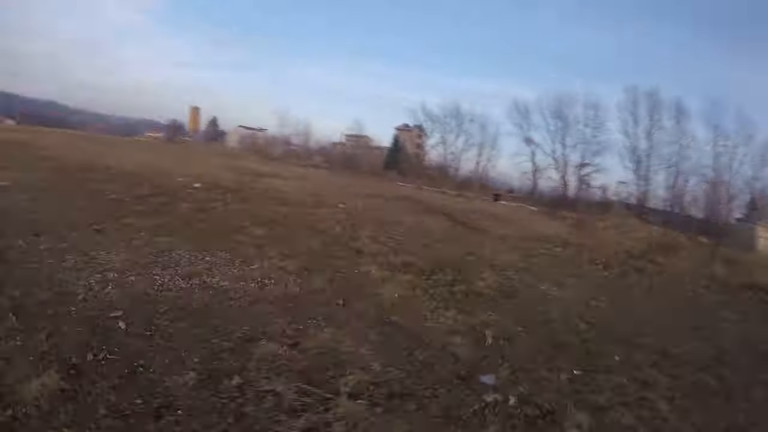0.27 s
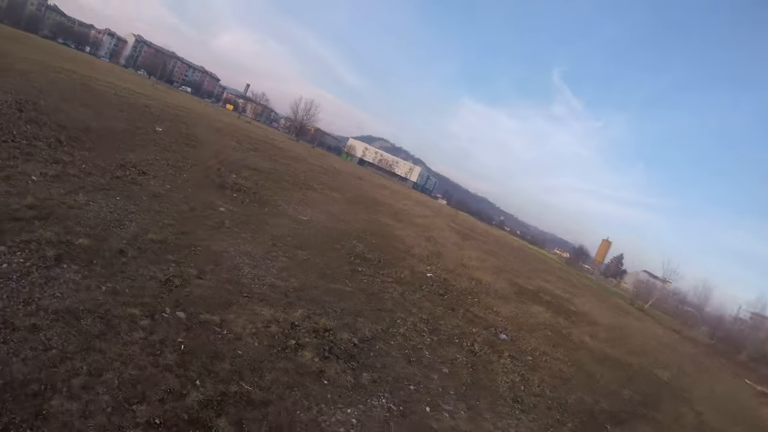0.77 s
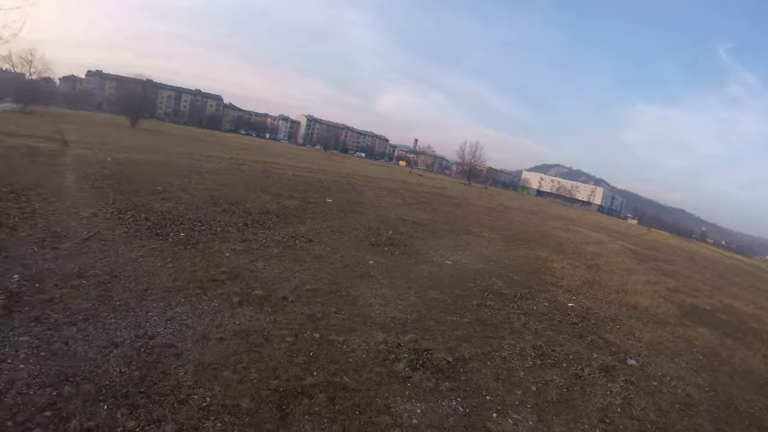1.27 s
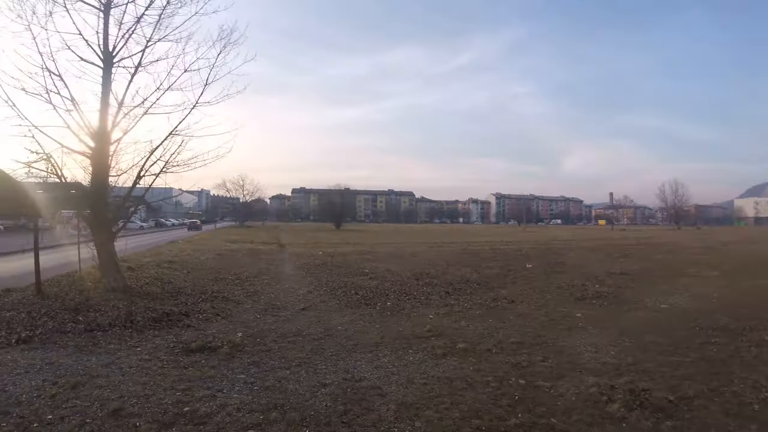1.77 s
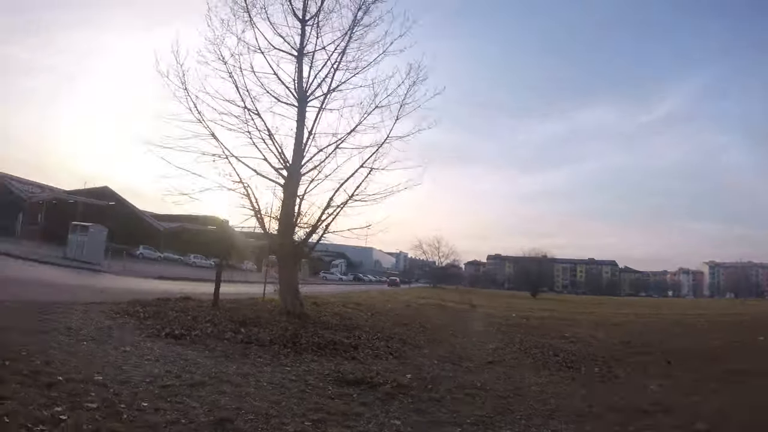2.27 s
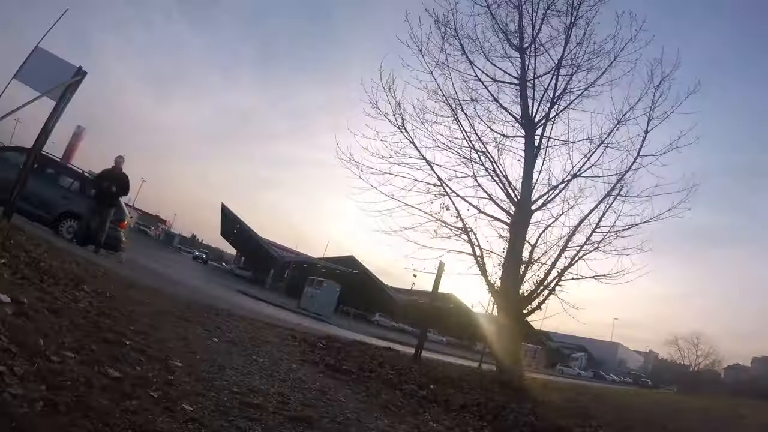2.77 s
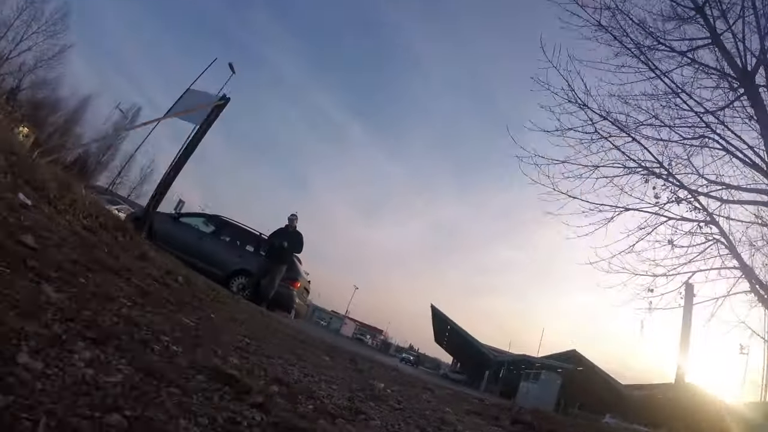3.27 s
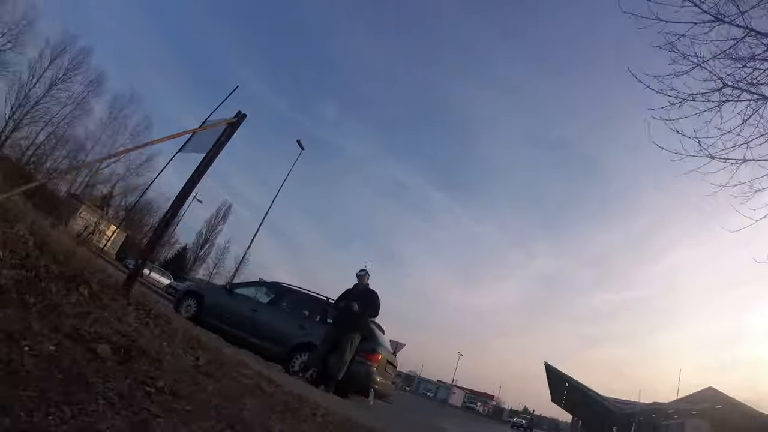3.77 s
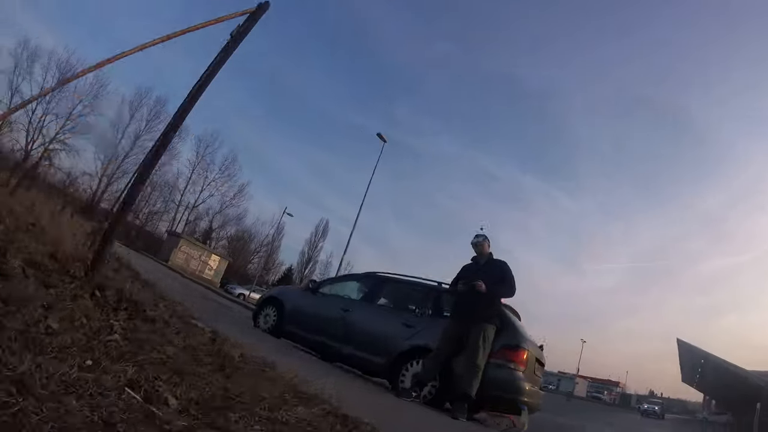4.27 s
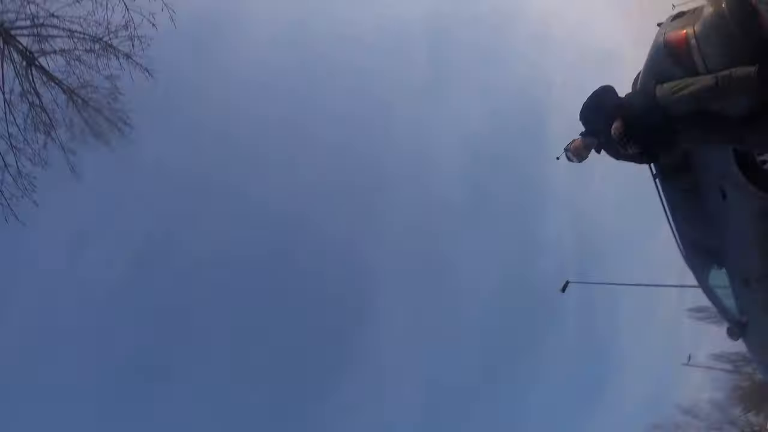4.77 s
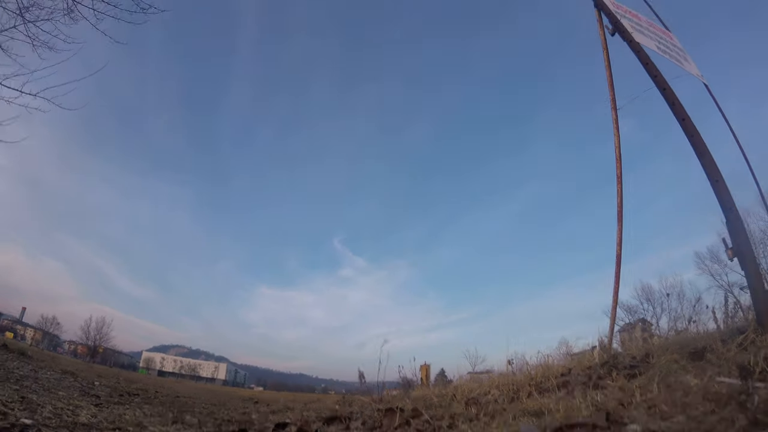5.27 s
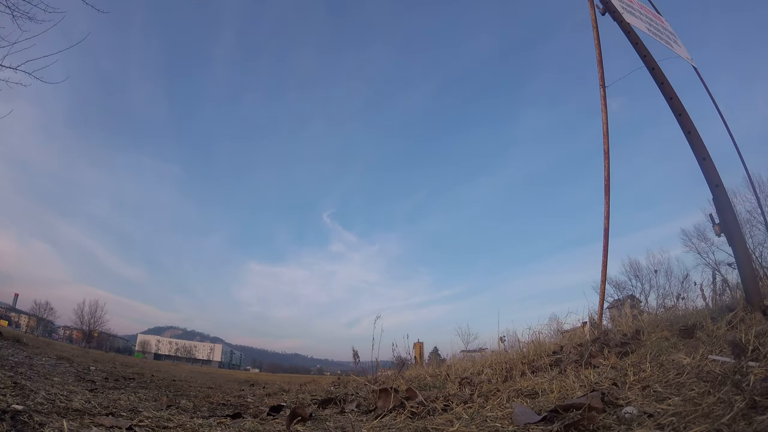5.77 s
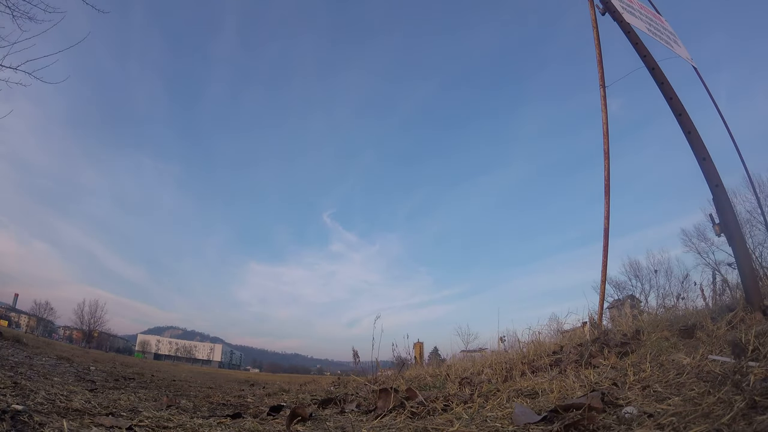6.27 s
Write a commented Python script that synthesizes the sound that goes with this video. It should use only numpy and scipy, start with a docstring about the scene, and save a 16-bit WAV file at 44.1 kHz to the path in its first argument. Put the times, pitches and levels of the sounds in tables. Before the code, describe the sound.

Small propellers buzz and hiss very close to the microphone, pitch leaping up and falling twice before a slack lull, then a steadier wavering drone that swells again. It stops abruptly; dull thumps, brittle stalk cracks and a short scrape follow, then a second bounce and crunch, and quiet open air with one tiny late crackle.

```python
"""Small drone cuts out and drops into the grass

Four motors whine as their three-blade propellers change speed, heard by a microphone on the craft: sines on
the orders of each shaft. Filtered noise makes the wash, blade-tip hiss and buffeting. The power is cut just
above the grass; the frame thuds, bounces and rings (decaying sines), stalks crack and drag (noise bursts and
a noise bed), and it comes to rest in a faint outdoor background, noise whose level falls and rises again."""
import sys
import numpy as np
from scipy.fft import rfft, irfft, next_fast_len
from scipy.io import wavfile
from scipy.ndimage import uniform_filter1d, map_coordinates

SR = 44100
rng = np.random.default_rng(int(sys.argv[2]) if len(sys.argv) > 2 else 0)


def generate_wav(signal):
    """Clip the signal to [-1, 1] and save it as 16-bit WAV at the path in sys.argv[1]."""
    frames = np.transpose(np.atleast_2d(signal))
    scaled = np.clip(frames, -1, 1) * 32767
    pcm = np.round(scaled).astype(np.int16)
    wavfile.write(sys.argv[1], SR, pcm)


N = 288408
CUT_S = 4.335  # the motors have lost all power by now


def amp(db):
    """Decibels to a linear gain."""
    return 10 ** (np.asarray(db) / 20)


def curves(rows):
    """One value per sample for each column after the time, joined by straight lines."""
    s, *cols = np.transpose(rows)
    return [np.interp(np.arange(N) / SR, s, c) for c in cols]


def wobble(rate):
    """A smooth random curve with rate knots a second."""
    steps = np.arange(0, N + 16, 16)  # computed every 16 samples, then joined
    knots = rng.standard_normal(int(N * rate / SR) + 4)
    return np.interp(np.arange(N), steps, map_coordinates(knots, [steps * rate / SR]))


def noise(spectrum, size=N):
    """Noise of rms 1, shaped by (Hz, relative dB) points joined on a log frequency axis."""
    m = next_fast_len(size + 4096)
    hz, db = np.transpose(spectrum)
    log_hz = np.log(np.fft.rfftfreq(m, 1 / SR) + 1)
    gain = amp(np.interp(log_hz, np.log(hz + 1), db, left=-120, right=-120))
    x = irfft(rfft(rng.standard_normal(m)) * gain, m)[:size]
    return x / np.std(x)


def background():
    """Faint outdoor noise, a low rumble and a broad field sound, heard once the motors are silent."""
    # Background level after the crash, dropping and then rising again.
    # Each row: time in seconds, rumble level in dB, field level in dB.
    background_levels = [(4.5, -29, -52), (5.0, -35, -63.5), (5.45, -46, -65), (5.7, -54.5, -59.5),
                         (6.1, -47, -54.5), (6.54, -41, -51)]
    # Colour of the field. Each row: frequency in Hz, relative level in dB.
    field_spectrum = [(90, -24), (150, -2), (250, -10.5), (700, -17), (1500, -25), (2800, -37), (4600, -51),
                      (7500, -37.5), (10000, -41), (12000, -57), (15000, -58)]
    rumble_db, field_db = curves([(4.4, -93, -92)] + background_levels)
    rumble_spectrum = [(20, -5.5), (45, -3.0), (90, -5.5), (160, -24.5), (250, -38.0)]
    rumble = amp(rumble_db + 2.8 * wobble(8.3)) * noise(rumble_spectrum)
    field = amp(field_db + 0.85 * wobble(9)) * noise(field_spectrum)
    return rumble + field


def stalks_drag():
    """Dry stalks scrape along the frame: unsteady noise that swells and fades with each slide."""
    # Each row: moment of the loudest scrape in seconds, level in dB, fade in dB per second.
    slides = [(4.33, -19.5, 170), (4.68, -42.5, 126), (4.9, -55.5, 48), (5.09, -53.5, 10), (5.231, -31, 88)]
    rise_db_per_s, end_s = 297.5, 5.42
    now = np.arange(N) / SR
    drag_db = np.max([db - np.maximum(fade * (now - s), rise_db_per_s * (s - now))
                      for s, db, fade in slides], axis=0)
    drag_db = drag_db - 150 * np.maximum(now - end_s, 0)  # extra fade after the last slide
    spectrum = [(150, -2.5), (400, 8), (1000, -9.0), (2200, -20.5), (3500, -49), (5500, -28.0), (9000, -53.0)]
    return amp(drag_db + 4.2 * wobble(90)) * noise(spectrum)


def stalks_crack():
    """Blades and stalks crack: each is a dying crunch of bright snap, treble fizz and dull body."""
    # Each row: start in seconds, relative level in dB, body and treble in dB over that level.
    cracks = [(4.526, -58, 14, -20), (4.576, -16, 16.5, -2.5), (4.585, -25.5, 18, -11),
              (4.6002, -21, 0, -5.5), (4.6189, -21.5, 12, -9), (4.6543, -31, 14, -11),
              (4.693, -33.5, 10, -11), (4.715, -46, 11, -22), (4.761, -56, 17, -28),
              (4.8419, -31.5, 20.5, -14), (4.9138, -50, 19.5, -17), (5.001, -54, 15, -1),
              (5.0837, -45, 11, -11), (5.178, -31, 4, -7.5), (5.1901, -17, 9.5, -17),
              (5.206, -28.5, 11, -19), (5.2188, -23, -5, -20.5), (5.2446, -33, 17, -24),
              (5.27, -44, 14, -12), (5.2968, -42, 18, -10), (5.312, -34.5, 17.5, -13),
              (5.3297, -37, 18.5, -13), (5.368, -44.5, 23, -14), (5.44, -52, 16, -22),
              (6.4417, -44, -6, -4)]
    # Colours of the snap, treble and body. Each row: frequency in Hz, relative level in dB.
    snap_spectrum = [(600, -12), (900, -3.5), (2000, -5), (2600, -16.5), (4000, -26.5)]
    fizz_spectrum = [(3500, -24.5), (5000, -11.5), (5500, -4), (6100, -9), (9500, -12), (11400, -30),
                     (15000, -45.5)]
    body_spectrum = [(150, -17), (250, -5), (500, -12.5), (1000, -23.5), (1500, -57.5)]
    x, t = np.zeros(N + SR), np.arange(SR // 5 * 2) / SR
    grit = np.pad(amp(3 * wobble(450)), (0, SR))  # each crunch is many small breaks
    for s, db, body_db, fizz_db in cracks:
        start = round(s * SR)
        length = amp(0.2 * (db + 24))  # faint cracks die sooner
        fizz = amp(fizz_db - 60 * t / 0.23) * noise(fizz_spectrum, size=len(t))
        bright = noise(snap_spectrum, size=len(t)) + fizz
        snap = amp(-60 * t / (0.083 * length)) * bright * (1 - np.exp(-t / 0.0013))
        snap = snap * grit[start:][:len(t)]
        body = amp(body_db - 60 * t / (0.12 * length)) * noise(body_spectrum, size=len(t))
        body = body * (1 - np.exp(-t / 0.0015))
        x[start:][:len(t)] += amp(db - 6.5) * (snap + body)
    return x[:N]


def thuds():
    """The frame meets the ground: each impact is one slow push and a ring of the frame's modes."""
    # Each row: start in seconds, relative push level in dB, push frequency in Hz, relative ring level in dB.
    impacts = [(4.319, -13.5, 70.4, -11.5), (4.37, -32, 60, -10.5), (4.546, -32, 90, -15),
               (4.577, 5.5, 50.2, -8), (4.604, 0, 45, -9), (4.632, -21, 60, -30), (4.86, -4, 39.8, -26),
               (5.088, -17, 40, -33.5), (5.173, -30, 120, -10.5), (5.192, 4.5, 84.3, -14.5),
               (5.219, -6.5, 60, -14), (5.318, 0.5, 61, -30), (5.385, -8.5, 50, -30),
               (5.44, -28, 59.6, -38)]
    # Modes of the frame. Each row: frequency in Hz, relative level in dB, time to fall 60 dB in seconds.
    frame_modes = [(89, 2.5, 0.36), (249, -13, 0.52), (519, -18.5, 0.2)]
    x, t = np.zeros(N + SR), np.arange(SR // 5 * 2) / SR
    for s, push_db, hz, ring_db in impacts:
        push = amp(push_db + 7.5 - 13 * (t * hz) ** 1.2) * np.sin(2 * np.pi * hz * t)
        push = push * (1 - np.exp(-t * hz / 0.31))
        # every impact strikes the modes a little differently
        ring = sum(amp(db + rng.normal(0, 1.3) - 60 * t / t60) * np.sin(2 * np.pi * f * t)
                   for f, db, t60 in frame_modes)
        ring = ring * (1 - np.exp(-t / .006))
        x[round(s * SR):][:len(t)] += push / 2 + amp(ring_db) * ring
    return x[:N]


def air(chop, running):
    """Propeller wash buffets the microphone, rasps round the frame and hisses off the tips at each blade pass."""
    # Blade-tip hiss. Each row: time in seconds, base level in dB.
    tip_hiss = [(0.0, -42), (0.08, -31.5), (0.14, -29.5), (0.41, -37.5), (0.52, -43.5), (0.56, -33),
                (0.71, -33.5), (0.94, -62), (1.14, -49.5), (1.16, -42.5), (1.24, -34.5), (2.06, -30),
                (2.22, -34), (2.56, -32), (2.82, -34.5), (2.88, -30), (3.34, -31.5), (3.58, -39),
                (4.02, -31.5), (4.31, -33.5)]
    # Wash hits the microphone. Each row: centre in seconds, level in dB, half length in seconds.
    gust_hits = [(0, -25.5, .04), (.3, -32.5, .05), (0.5, -25.5, .04), (.84, -45.5, .04), (1.002, -43, .06),
                 (1.181, -23, .03), (2.68, -20.5, .1), (2.869, -6.5, .04), (3.12, -27, .1),
                 (3.259, -17.5, .04), (4.103, -34, .08), (4.331, -20, .04), (4.47, -29, .06)]
    # Colours of the buffet, wash and hiss. Each row: frequency in Hz, relative level in dB.
    buffet_spectrum = [(20, -2.5), (40, -2.5), (90, 5.5), (130, 3.5), (200, -20.5)]
    wash_spectrum = [(59, -45.5), (100, -18.5), (156, -9.5), (180, 2.5), (202, -6.5), (273, -18.5),
                     (532, -12.5), (698, -19.5), (2270, -24), (4500, -39), (5850, -88), (9900, -120)]
    hiss_spectrum = [(2060, 4), (3500, -9), (4040, -21.5), (4520, -10), (5580, -1), (7570, -0.5),
                     (9300, -3.5), (9780, -6.5), (11600, -26), (12800, -26.5), (14500, -28.5), (15500, -34)]
    t = np.arange(N) / SR
    hiss_db = curves(tip_hiss)[0] - 265 * np.maximum(t - CUT_S, 0)  # fades as the blades coast to rest
    gusts = sum(amp(db) * np.exp(-((t - s) / half) ** 2) for s, db, half in gust_hits)
    thrust = uniform_filter1d(running, size=SR // 16)  # the wash collapses with the thrust
    swell = wobble(18)  # shared by wash and hiss
    buffet = (amp(-34) * thrust + gusts) * amp(1.5 * wobble(9.7)) * noise(buffet_spectrum)
    # the wash follows the hiss at half its dB, and each gust roughens it
    wash = amp(-27.5 + .5 * (hiss_db + 31.5)) + amp(-24) * gusts
    wash = thrust * wash * amp(5.5 + 0.56 * swell + 0.9 * wobble(120) + 2.65 * chop) * noise(wash_spectrum)
    hiss = amp(hiss_db + 0.76 * swell + 0.76 * wobble(250) + 2.6 * chop) * noise(hiss_spectrum)
    return buffet + wash + hiss


def motor(speeds, levels, second_db, fall_db, whine_db):
    """Tones on the orders of one shaft, unsteady in the turbulent air, and the angle the shaft has turned."""
    inertia_s = .03  # the rotor's weight rounds every change of speed
    hover = 180  # shaft turns per second
    wander_db = 1.28  # slow drift of each tone
    speed = uniform_filter1d(curves(speeds)[0], size=round(inertia_s * SR))
    shake_db, blade_db, over_db = (db + wander_db * wobble(7) for db in curves(levels))
    fall_db = fall_db + 0.07 * np.log2(speed / hover)  # overtones fall slightly faster at speed
    # quick unevenness of the speed blurs the higher overtones most
    uneven_speed = speed * (1 + 0.002987 * wobble(25) + .008 * wobble(90))
    turn = 2 * np.pi * np.cumsum(uneven_speed) / SR

    def tone(order, db, rough_db):
        """A sine at a multiple of the shaft speed, with a flickering level."""
        return amp(db + rough_db * wobble(35)) * np.sin(order * turn + 2 * np.pi * rng.random())

    # imbalance, its second order, and the tone of three blades passing
    x = tone(1, shake_db, 0.17) + tone(2, blade_db + second_db, 3.1) + tone(3, blade_db, 0.46)
    for k in range(5):  # overtones of the blade tone, each flickering more than the one below
        order = 6 + 3 * k
        housing = 1 / (1 + (order * speed / 4300) ** 4) ** .5  # the housing dulls the treble
        x = x + tone(order, over_db - k * fall_db, 1.17 + .7 * k) * housing
    # the current rises while braking or speeding up
    current = np.tanh(uniform_filter1d(np.abs(np.gradient(speed)) * SR, size=900) / 500)
    smear = wobble(260)  # uneven switching blurs the whine
    for order, db in ((42, whine_db), (66, whine_db - 9)):
        # the magnets' whine shows where it crosses a housing resonance
        near = 1 / (1 + ((order * speed - 5400) / 350) ** 2)
        x = x + near * (0.055 + current) * smear * tone(order, db, 4.3)
    return np.sqrt(2) * x, turn


def drone():
    """Four motors, silent within a few turns of the power cut, and the air that their blades chop."""
    # What each motor is told to do; 1 and 2 are nearest the microphone.
    # Each row: time in seconds, speed in shaft turns per second.
    speed_1 = [(0, 128), (.05, 160), (.19, 340), (.215, 354), (.3, 303), (.36, 236), (.435, 107),
               (.52, 104), (.555, 150), (.59, 255), (.655, 274), (.72, 258), (.76, 218), (.835, 88),
               (1, 78), (1.12, 100), (1.2, 130), (1.27, 162), (1.8, 160.5), (2, 172.5), (2.21, 173.5),
               (2.31, 154), (2.46, 178), (2.61, 182), (2.8, 154), (2.98, 184), (3.15, 187), (3.35, 227),
               (3.46, 224), (3.55, 156), (3.75, 155.5), (3.87, 149.5), (4.05, 166), (4.2, 171), (4.33, 152)]
    speed_2 = [(0, 82), (.05, 97), (.155, 170), (.27, 315), (.32, 342), (.375, 336), (.44, 203),
               (.485, 187), (.525, 200), (.575, 307), (.605, 314), (.655, 340), (.715, 318), (.765, 212),
               (.82, 126), (1.13, 112), (1.2, 153), (1.3, 175), (1.51, 185), (1.79, 184), (2.05, 200.5),
               (2.19, 201), (2.29, 171), (2.35, 166), (2.45, 187.5), (2.64, 192), (2.79, 141), (2.95, 194),
               (3.27, 215), (3.37, 235), (3.46, 223), (3.55, 161), (3.65, 157), (3.83, 159), (4.09, 180),
               (4.21, 179), (4.33, 161)]
    speed_3 = [(0, 182), (0.199, 234.1), (.33, 311.4), (.5, 124.7), (.56, 229.8), (.65, 319.7),
               (.75, 224.3), (0.851, 89.66), (1.12, 80.4), (1.3, 157.5), (1.5, 183), (2.299, 181.2),
               (2.5, 200.9), (2.8, 152), (3, 197), (3.3, 232), (3.5, 233.1), (3.58, 186.4), (3.8, 173),
               (4.05, 189.2), (4.33, 187.5)]
    speed_4 = [(0, 200), (.15, 341.6), (0.239, 413), (0.348, 304.5), (0.449, 137), (1.151, 114.9),
               (1.299, 200.5), (1.6, 211.5), (2.2, 226.9), (2.801, 177.8), (3.4, 262.6), (3.6, 218.1),
               (4.33, 214.6)]
    # How loud each motor is heard as the craft rolls and pitches.
    # Each row: time in seconds, then imbalance, blade tone and first overtone levels in dB.
    level_1 = [(0, -19, -19.5, -41), (.2, -12, -14, -28.5), (.27, -12, -20, -40.5), (.37, -18.5, -38, -55),
               (.44, -20, -15.5, -32), (.56, -27, -22.5, -40), (.7, -27, -22.5, -50.5),
               (.84, -18.5, -27.5, -47), (0.899, -30, -40, -46), (1.08, -53, -33.5, -40),
               (1.17, -23, -21.5, -34), (1.5, -18.5, -16, -43.5), (2.2, -17, -16.5, -34),
               (2.62, -18, -15, -27), (2.82, -23.5, -16, -34.5), (2.95, -18, -18.5, -32),
               (3.26, -19.5, -14, -29.5), (3.46, -17.5, -26.5, -34.5), (3.58, -17, -22.5, -34),
               (3.9, -23, -25, -32), (4.32, -25.5, -15.5, -30.5)]
    level_2 = [(0, -35, -32, -50), (.07, -22, -16, -32.5), (.2, -29, -25.5, -46), (.27, -29, -13.5, -27),
               (.33, -14, -18, -27.5), (0.389, -13.5, -17, -24.5), (.46, -32, -30, -35.5),
               (.56, -26.5, -13, -24.5), (.74, -15, -18.5, -27.5), (.84, -44, -30, -42),
               (.88, -50, -47, -54), (1.11, -46, -36, -37), (1.3, -37, -18, -29), (1.8, -20, -17, -26.5),
               (2.18, -15, -15.5, -28), (2.4, -35.5, -16.5, -30.5), (2.82, -13, -18.5, -28.5),
               (3.12, -28, -16.5, -30), (3.26, -30.5, -22.5, -26), (3.38, -8.5, -16.5, -28.5),
               (3.55, -36, -18, -32.5), (4.08, -20.5, -14.5, -25.5), (4.32, -14, -15.5, -29.5)]
    level_3 = [(0, -47, -32, -52), (.1, -34, -27, -52), (.16, -11.5, -36.5, -54.5),
               (.4, -15.5, -40.5, -58.5), (.5, -40, -16.5, -30.5), (.56, -13, -45.5, -57.5),
               (.75, -15.5, -50.5, -52), (.85, -39, -33.5, -43.5), (1.1, -50, -44, -50),
               (1.17, -14, -30, -45), (1.7, -21.5, -29, -66), (1.85, -34.5, -31.5, -53),
               (2.5, -18, -24.5, -36), (2.75, -38, -24.5, -39.5), (3.1, -12.5, -23.5, -38.5),
               (3.5, -13, -30.5, -39), (3.9, -17.5, -39, -45), (4.33, -18, -27, -36.5)]
    level_4 = [(0, -26.5, -41, -54), (.22, -27.5, -27, -32.5), (.32, -23.5, -25, -37),
               (.45, -41, -37.5, -46.5), (1.15, -49.5, -40.5, -50.5), (1.35, -20, -47, -53),
               (1.7, -30.5, -43, -58), (1.85, -52.5, -47, -49), (3.1, -30.5, -41.5, -42),
               (3.4, -11.5, -27.5, -40), (3.6, -42.5, -40.5, -46), (4.33, -42, -40, -54)]
    # One row per motor: second order relative to the blade tone in dB,
    # fall per overtone in dB at hover speed, relative magnet whine level in dB.
    voices = [(-25.5, 4.5, -42), (-17, 5.5, -43), (-13.5, 4.5, -49), (-15.5, 4.5, -49)]
    speeds = (speed_1, speed_2, speed_3, speed_4)
    levels = (level_1, level_2, level_3, level_4)
    motors = [motor(speed, level, *voice) for speed, level, voice in zip(speeds, levels, voices)]
    running = np.clip((CUT_S - np.arange(N) / SR) / 0.036, 0, 1)  # 36 ms fade
    chop = running * sum(np.sin(3 * turn) for _, turn in motors[:2])  # three blades on the near motors
    return running * sum(x for x, _ in motors) + air(chop, running)


def scene():
    """The outdoor background, the crash into the grass and the drone, as one channel."""
    crash = stalks_drag() + stalks_crack() + thuds()
    return (background() + crash + drone())[None]


def record(dry):
    """Peaks are rounded off near full scale; nothing is kept above the band limit."""
    top_hz = 15150
    x = dry / (1 + np.abs(dry / .97) ** 5) ** (1 / 5)
    m = next_fast_len(N + 4096)
    # ramp from the end back to the start, so the filter sees no jump
    padded = np.pad(x, ((0, 0), (0, m - N)), "linear_ramp", end_values=x[0, 0])
    return irfft(rfft(padded) * (np.fft.rfftfreq(m, 1 / SR) < top_hz), m)[:, :N]


dry = scene()
out = record(dry)
generate_wav(out)
```